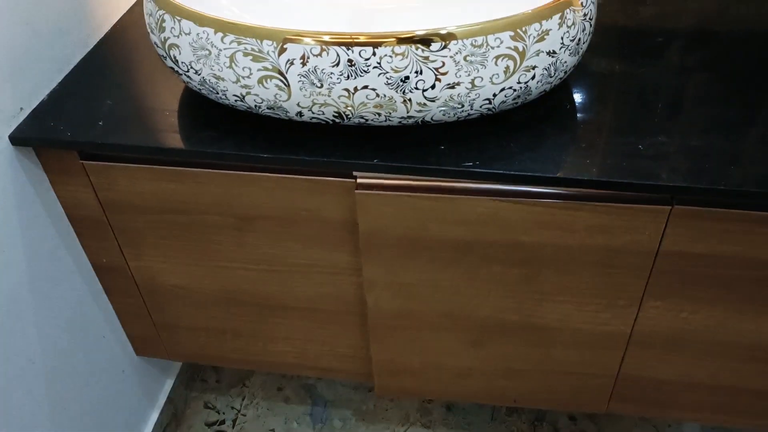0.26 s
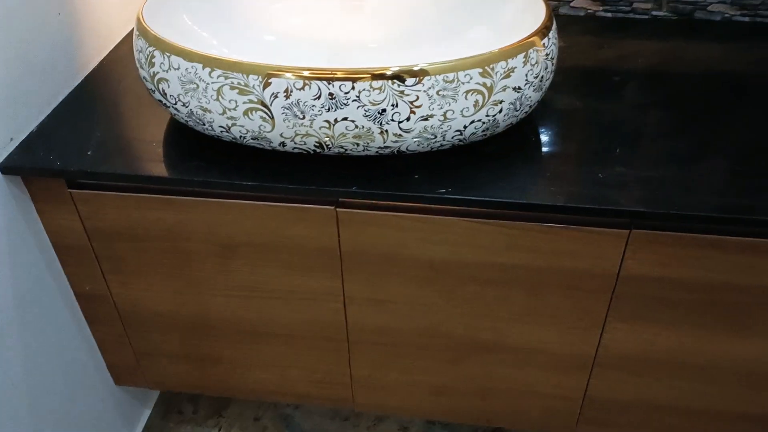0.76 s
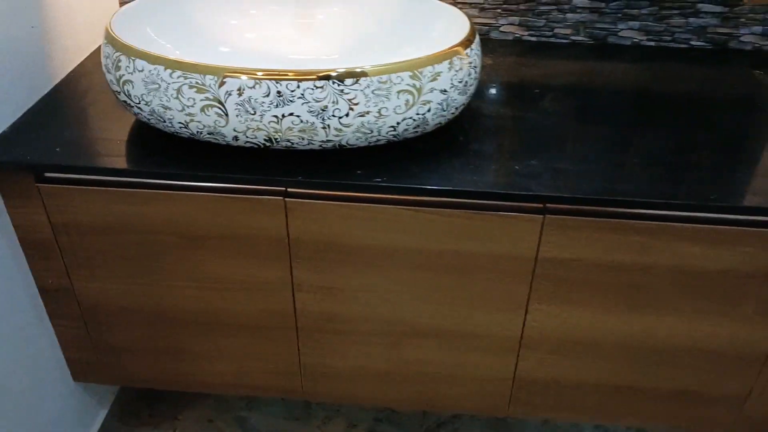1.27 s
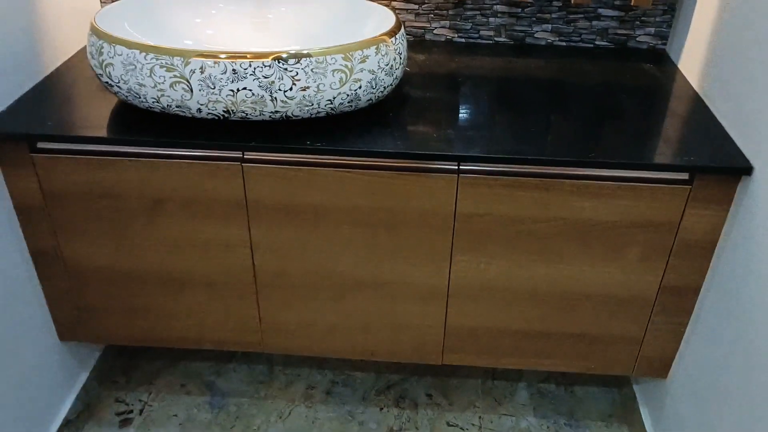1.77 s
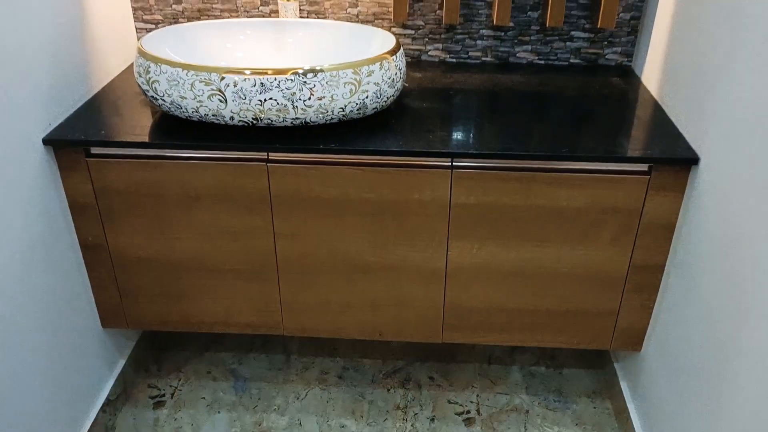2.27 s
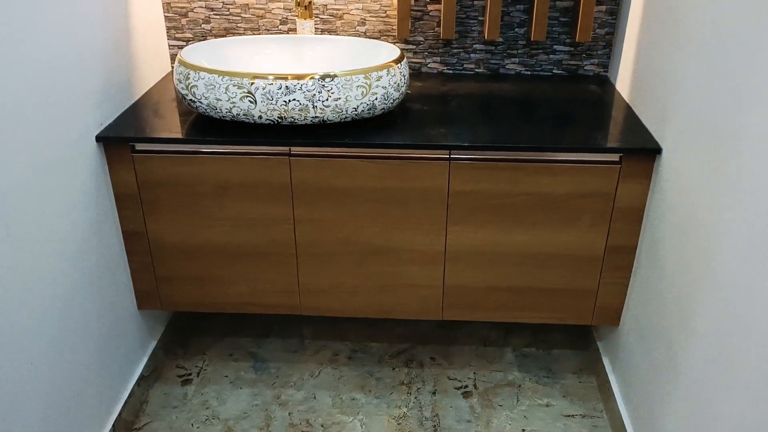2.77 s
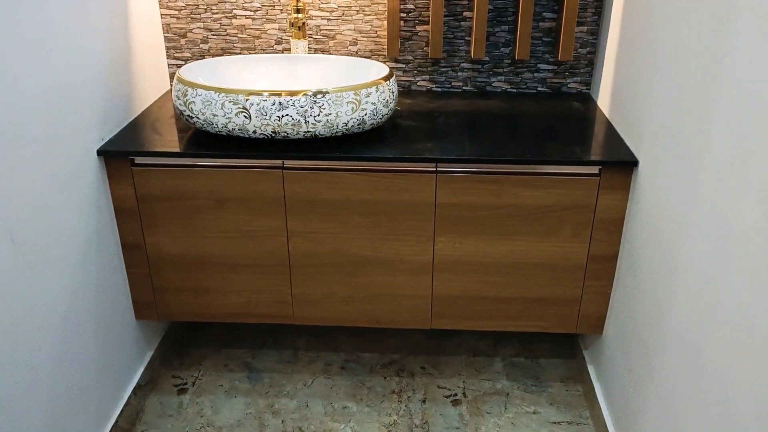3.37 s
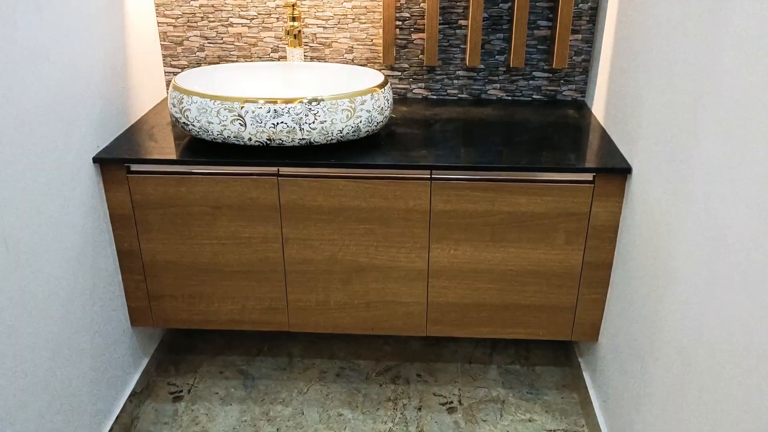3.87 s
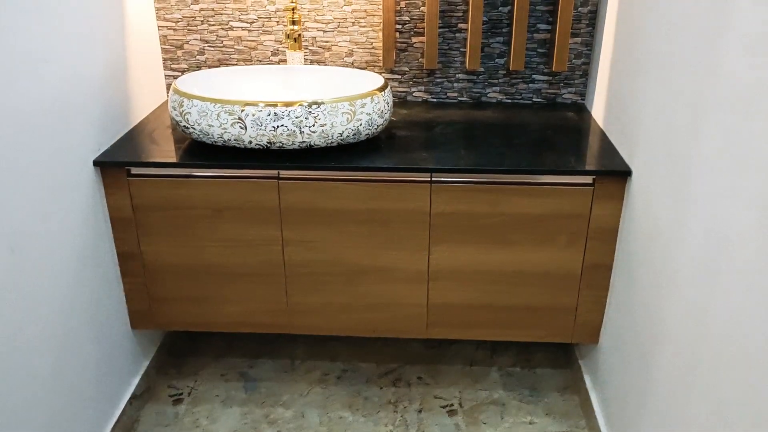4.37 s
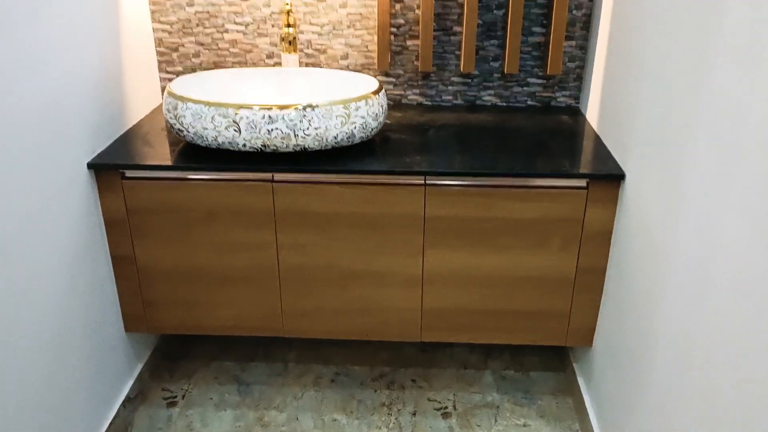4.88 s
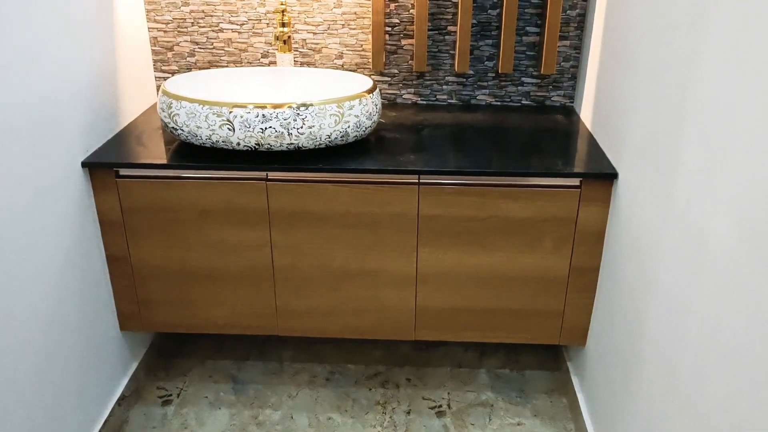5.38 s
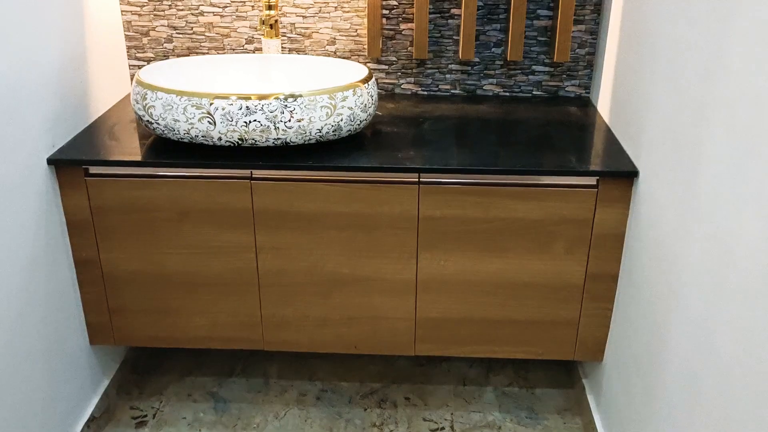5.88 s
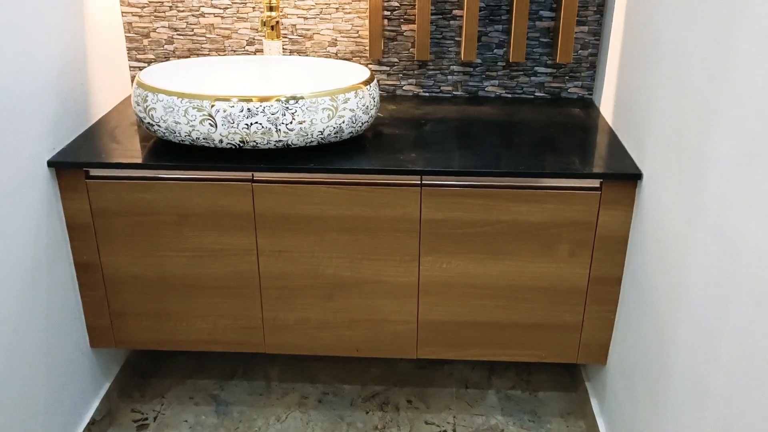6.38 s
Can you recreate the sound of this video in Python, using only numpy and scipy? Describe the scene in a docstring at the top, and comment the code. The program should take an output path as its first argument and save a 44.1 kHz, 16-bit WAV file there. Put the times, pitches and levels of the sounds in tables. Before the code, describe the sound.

Hollow wooden clack of a closing cupboard door, gritty shoe scrapes in a tiled washroom, then loud handling clicks and thumps, with faint cricket chirping.

```python
"""Tiled washroom: a small wooden cabinet door falls shut, its bounces ringing damped panel modes.
Sandals scuff backwards over gritty stone: shaped noise pushed up by grains, with slaps and larger grit on top.
Fingers rub, tick and thump the case of the hand-held recorder close to one microphone port or the other.
A cricket outside chirps in sliding sine strokes, over noise-made hush and hiss, a thin wavering whine and pips."""
import sys
import numpy as np
from scipy import signal
from scipy.fft import rfft, irfft, next_fast_len
from scipy.io import wavfile
from scipy.ndimage import uniform_filter1d

SR = 44100
rng = np.random.default_rng(int(sys.argv[2]) if len(sys.argv) > 2 else 0)


def persist_wave(psi):
    """Save psi, clipped to +-1, as 16-bit WAV."""
    counts = np.round(np.clip(psi, -1, 1) * 32767).astype(np.int16)
    wavfile.write(sys.argv[1], SR, np.atleast_2d(counts).T)


N = 292378  # length in samples


def amp(db):
    """Decibels to gain."""
    return 10 ** (np.asarray(db) / 20)


def evened(x):
    """Scales to rms 1."""
    return x / np.sqrt(np.mean(x ** 2) + 1e-20)


def read(points, hz):
    """Reads a table on a log-frequency axis."""
    f, value = np.transpose(points)
    return np.interp(np.log(hz + 1), np.log(f + 1), value)


def add(mix, s, sound):
    """Adds a sound into the mix at time s."""
    part = mix[..., max(round(s * SR), 0):][..., :sound.shape[-1]]
    part += sound[..., :part.shape[-1]]


def colour(x, gain):
    """Filters x by a gain given as a function of frequency."""
    size = next_fast_len(x.shape[-1] + 1024)
    spectrum = rfft(x, size) * gain(np.fft.rfftfreq(size, 1 / SR))
    return irfft(spectrum, size)[..., :x.shape[-1]]


def pair(x, pan_db):
    """Pans two channels, left over right; their mean keeps the level of x when they are unrelated."""
    left = 1 / (1 + amp(-2 * np.asarray(pan_db)))  # share of the power
    return 2 * np.array([np.sqrt(left) * x[0], np.sqrt(1 - left) * x[1]])


def ring(hz, t60):
    """One damped mode struck once."""
    t = np.arange(round(t60 * SR) + 20) / SR
    return amp(-60 * t / t60) * np.sin(2 * np.pi * hz * t)


# left-right likeness of diffuse sound: (f/Hz, correlation -1 to 1)
LIKENESS = [(60, 0.91), (150, 0.94), (380, 0.76), (950, 0.018), (2380, -0.16), (5980, -0.38), (15000, 0.22)]


def spread(left, other, hz):
    """Blends two unrelated spectra into a stereo pair: nearly shared bass, separate or opposed treble."""
    same = read(LIKENESS, hz)[:, None]
    return np.array([left, same * left + np.sqrt(1 - same ** 2) * other])


# room hush and microphone hiss at the left port: (f/Hz, relative level/dB per Hz)
HUSH_LEFT = [(30, -34), (130, -10.5), (220, -17), (280, -10.5), (420, -19.5), (520, -24), (800, -20.5),
             (1000, -29), (2300, -32.5), (3100, -28), (3800, -32.5), (5800, -31), (7200, -19.5),
             (15500, -7)]
# the same at the right port: (f/Hz, relative level/dB per Hz)
HUSH_RIGHT = [(30, -26.5), (130, -12), (220, -15.5), (280, -10), (420, -17), (520, -20.5), (1200, -26),
              (3100, -22.5), (3700, -25), (4700, -18), (6300, -38.5), (7400, -31.5), (12000, -22),
              (15500, -33)]
HUSH_DB = -60  # rms level


def hush():
    """Random short-time spectra with drifting patches make the room hush and microphone hiss."""
    frames, hz = N // 256 + 5, np.fft.rfftfreq(1024, 1 / SR)
    a, b, c, d, patches, streaks = rng.standard_normal((frames, 513, 6)).T
    patches = evened(uniform_filter1d(uniform_filter1d(patches, 8, 0), 16, 1))
    # narrower and longer, so thin tones come and go
    streaks = evened(uniform_filter1d(uniform_filter1d(streaks, 2, 0), 24, 1))
    z = spread(a + 1j * b, c + 1j * d, hz)
    # the hiss drops above 7.9 kHz, further on the left
    treble_step_db = np.array([[-33.5], [-14.5]])
    shape_db = [read(HUSH_LEFT, hz), read(HUSH_RIGHT, hz)] + treble_step_db / (1 + (7900 / (hz + 1)) ** 60)
    z *= amp(shape_db[:, :, None] + 1.6 * patches + 1.686 * streaks)
    noise = signal.istft(z, nperseg=1024, noverlap=768)[1][:, :N]
    return amp(HUSH_DB) * evened(noise)


# short faint pips: (t/s, length/s, f/Hz, level/dB)
PIPS = [(0, 0.038, 2940, -64), (0.388, 0.029, 3190, -65.5), (0.395, 0.044, 3000, -66),
        (0.674, 0.14, 2100, -73.5), (1.09, 0.12, 2940, -75), (3.923, 0.034, 2760, -63),
        (3.936, 0.046, 2200, -69), (4.17, .1, 3040, -72), (5.18, 0.1, 2570, -70.5),
        (5.534, 0.18, 3240, -70)]
WHINE_HZ, WHINE_DB, WAVER_DB, WAVER_S = 4850, -82, 5.5, 0.069  # a thin tone whose level wavers


def whine():
    """Noise in narrow resonances: one long wavering tone and some short pips."""
    waver = evened(colour(rng.standard_normal(N), lambda f: np.exp(-(f * WAVER_S) ** 2)))
    tone = colour(rng.standard_normal((2, N)), lambda f: 1 / (1 + ((f - WHINE_HZ) / 30) ** 2))
    out = amp(WHINE_DB + WAVER_DB * waver) * pair(evened(tone), -2.5)
    for s, length, hz, db in PIPS:
        size = round(length * SR)
        noise = rng.standard_normal((2, SR // 4))
        pip = colour(noise, lambda f: 1 / (1 + ((f - hz) / 35) ** 2))[:, :size]
        add(out, s, amp(db) * np.hanning(size) * pair(evened(pip), -8))
    return out


# cricket chirps: (t/s, level/dB before the mix, downward slide f/Hz)
CHIRPS = [(0, -48.5, 503), (0.206, -50, 500), (0.457, -47, 613), (0.718, -47, 500), (0.929, -52, 500),
          (1.19, -47, 600), (1.404, -42, 300), (1.676, -43, 400), (1.94, -48, 400), (2.182, -42.5, 397),
          (5.897, -42, 790), (6.105, -37.5, 820), (6.338, -39, 777), (6.58, -40, 600)]


def cricket():
    """Each chirp is four short wing strokes sliding down in pitch; the middle two tend to be strongest."""
    out, t = np.zeros(N), np.arange(800) / SR
    for s, db, slide_hz in CHIRPS:
        for k, (off, fade_db) in enumerate(rng.standard_normal((4, 2))):
            hz = 4700 * (1 + 0.012 * off) - slide_hz * t / t[-1]
            stroke = np.sin(2 * np.pi * np.cumsum(hz) / SR) * np.hanning(len(t))
            stroke_db = db + 1.2 * fade_db - 1.4 * (k - 1.5) ** 2
            add(out, s + 0.028 * k, amp(stroke_db) * stroke)
    # the end of a deep slide hardly reaches the left port
    left = colour(out, lambda f: 1 / (1 + ((f - 4520) / 200) ** 2))
    return np.array([left, out])


# decay of the room: (f/Hz, t60/s)
WALLS = [(100, 0.2), (500, 0.23), (2000, 0.32), (6000, 0.25), (14000, 0.33)]


def room(x):
    """Sparse taps of random sign for each ear, each band dying at its own speed; the bass is shared."""
    taps = np.zeros((2, SR))
    at = np.arange(200, SR - 20, 20) + rng.integers(0, 20, (2, (SR - 201) // 20))
    np.put_along_axis(taps, at, rng.choice([-1., 1.], at.shape), 1)
    hz, t, z = signal.stft(taps, SR, nperseg=512)
    decay = amp(-60 * t / read(WALLS, hz)[:, None])
    tail = signal.istft(spread(z[0], z[1], hz) * decay, SR, nperseg=512)[1]
    return signal.fftconvolve(x, tail / np.linalg.norm(tail[0]), axes=1)[:, :N]


# how the ports colour airborne sound: (f/Hz, left over right level/dB)
PORTS = [(100, -0.5), (400, -1), (800, 2), (1300, -4), (2200, -5), (3200, -1), (4700, -6.5), (5600, -1.5),
         (6500, 13), (7500, 10), (8500, -3.5), (10000, -1.5), (12000, -11.5), (15000, -3.5)]


def ports(air):
    """The two microphone ports favour different bands of airborne sound."""
    return colour(air, lambda f: pair(np.ones((2, len(f))), read(PORTS, f)) / np.sqrt(2))


def patchy(x, depth_db):
    """The contact keeps shifting, so resonant patches come and go in a rubbing sound."""
    z = signal.stft(x, nperseg=256, noverlap=192)[2]
    field = rng.standard_normal(z.shape[1:])
    field = uniform_filter1d(uniform_filter1d(field, size=3, axis=0), size=20, axis=1)
    patches = amp(depth_db * evened(field))
    return signal.istft(z * patches, nperseg=256, noverlap=192)[1][:, :x.shape[-1]]


def gritty(size, per_s, spread_db, share):
    """Rubbing noise at both ears, pushed up briefly by grains of uneven size that come in clumps."""
    clumps = amp(5 * evened(uniform_filter1d(rng.standard_normal(size), 400)))
    sizes = amp(spread_db * np.minimum(rng.exponential(1, size), 4))
    grains = (rng.random(size) < clumps * per_s / SR) * sizes
    grains = signal.lfilter([1], [1, -.85], grains)  # each grain grinds for a fraction of a millisecond
    push = 1 - share + share * evened(grains)
    return patchy(rng.standard_normal((2, size)) * push, depth_db=1.9)


def three_bands(x, spectrum, low_hz, top_hz):
    """Colours x and splits it: below low_hz, from there to top_hz, and above 8 kHz, each at rms 1."""
    x = colour(x, lambda f: amp(read(spectrum, f)))
    low = colour(x, lambda f: 1 / (1 + (f / low_hz) ** 14))
    middle = colour(x - low, lambda f: 1 / (1 + (f / top_hz) ** 8))
    high = colour(x, lambda f: 1 - 1 / (1 + (f / 8000) ** 12))
    return evened(low), evened(middle), evened(high)


RISE_DB, FADE_DB = 30, 40  # contact starts this far down and fades by this much


def contact(rise_s, hold_s, change_db, fade_db_per_s):
    """Rise, hold and fade of a rubbing contact: its gain, and how many dB it has faded."""
    hold_s = max(hold_s, .001)
    t = np.arange(-rise_s, hold_s + FADE_DB / fade_db_per_s, 1 / SR)
    faded_db = fade_db_per_s * np.maximum(t - hold_s, 0)
    held_db = np.interp(t, [-rise_s, 0, hold_s], [-RISE_DB, 0, change_db])
    return amp(held_db - faded_db), faded_db


# a finger slides: (full contact t/s, level/dB, rise/s, hold/s, change over the hold/dB, fade/dB per s,
# left over right/dB, treble above 8 kHz/dB, rumble/dB, treble left over right/dB,
# low edge f/Hz, high edge f/Hz, share of stick-slip grains 0-1)
RUBS = [(1.847, -47.5, 0.0044, 0.019, 3.5, 147, 28, -9, -17.5, 27, 1220, 7800, .14),
        (1.936, -47.5, .06, 0.046, 3, 400, 29, -13.5, -26, 26, 1140, 6700, .14),
        (4.465, -49.5, 0.014, 0.021, 1, 900, 22, -23, -25, 8, 504, 5300, .36),
        (4.636, -45, 0.011, 0.039, -2.5, 1000, 19, -16, -24, 21, 550, 6100, .1),
        (4.741, -53.5, 0.0083, 0.015, 0, 1400, 22, -21, -28, 0, 607, 5960, 0.02),
        (4.779, -55, 0.0076, 0.033, -6.5, 900, 0, -17, 0, -5, 390, 7200, .4),
        (4.848, -41, 0.031, 0.021, 11.5, 2000, -1, -19.5, -10, -7, 308, 6500, .17),
        (4.88, -41, .006, 0.017, -10.5, 600, -2, -13, 3.5, -11.5, 307.6, 6500, .17),
        (4.935, -45.5, 0.026, .003, 0.5, 701, -18, -9, -4, -29, 2500, 5300, .3),
        (4.9455, -27, 0.0018, 0.00078, -5, 7000, -27.5, 3.5, -8, -39, 400, 8100, 0),
        (4.95, -41.5, 0.0043, 0.028, -2.5, 1300, -14, -6, 0.5, -32, 400, 8100, .62),
        (5.003, -62.5, 0.022, .02, -1.5, 300, -15, -5.5, 4, -25, 401, 8130, 0.1),
        (5.049, -44.5, 0.021, 0.042, -1, 452, -31, -9, -11, -33, 298, 5300, 0.02),
        (5.299, -62.5, 0.028, 0.13, -2.5, 1500, -21, -24, -7.5, -4, 840, 2900, .03)]
# skin near the left port: (f/Hz, relative level/dB per Hz)
SKIN_LEFT = [(47, -40), (80, -13.5), (278, -12.5), (508, -20.5), (776, -1), (1080, -13), (1420, -8.5),
             (3020, -8), (4310, -15), (6020, -9), (8220, -23), (14300, -19), (16400, -20.5)]
# skin near the right port: (f/Hz, relative level/dB per Hz)
SKIN_RIGHT = [(47, -34), (80, 8), (228, -3.5), (364, 1), (486, -6.5), (776, -2), (2210, -12.5), (2700, -17),
              (5270, -4.5), (7520, -30), (12000, -24), (15300, -32.5), (16400, -45)]
# the case ticks as skin lets go: (t/s, level/dB, left over right/dB, f/Hz, t60/s, port whistle/dB)
TICKS = [(1.847, -36, 20, 2500, 0.0019, -20), (4.532, -30, 24, 1640, 0.0013, -40),
         (4.54, -38.5, -15, 3000, 0.00079, -21), (4.632, -23, 30, 2155, 0.0041, -25),
         (4.78, -39.5, 19, 2500, 0.0051, -24), (4.792, -48, -12, 3000, .003, -15),
         (4.801, -46, -10, 5000, .003, -6), (4.843, -26.5, -14, 3650, 0.0033, -15),
         (4.848, -23, -15, 1200, 0.0019, -30), (4.857, -20, -25, 2660, 0.0024, -30),
         (4.867, -30, -4, 1500, 0.0018, -30), (4.871, -46, -3, 2020, .002, -28),
         (4.891, -25.5, -24, 1410, 0.0026, -6.5), (4.974, -29, -23, 900, .004, -28),
         (4.921, -36, -19, 4500, .003, -20), (4.939, -28.5, -4, 3500, 0.0024, -15),
         (4.9428, -12, -11, 2230, 0.0023, -3), (4.9443, -3.5, -23, 4400, 0.0024, -23),
         (5.111, -33.5, -25, 1120, 0.004, -23), (5.1125, -44, -24, 4530, 0.0027, -20),
         (5.188, -59, -15, 7150, .003, 5), (5.42, -43, -21, 1300, 0.0027, -20),
         (5.4215, -40.5, -15, 4130, 0.0024, -20)]
# the case flexes under the grip: (t/s, level/dB, left over right/dB, f/Hz, left sign against right)
THUMPS = [(4.791, -42, 4, 300, 1), (4.864, -46, 5, 300, 1), (4.873, -19, 25, 185, 1),
          (4.894, -31, 8, 302, 1), (4.9, -30, -11, 350, 1), (4.9418, -9.5, -2, 300, -1),
          (4.9436, -9, 30, 785, -1), (4.9752, -9.5, -24, 278, 1), (5.114, -28, -23, 412, 1),
          (5.617, -38.5, -18, 278, 1)]


def fingers():
    """Skin slides, ticks and thumps travel through the case straight to the ports, with no room."""
    out = np.zeros((2, N))
    for (s, level_db, rise_s, hold_s, change_db, fade, pan_db, treble_db, rumble_db, treble_pan_db,
         low_hz, top_hz, share) in RUBS:
        shape = contact(rise_s, hold_s, change_db, fade)[0]
        slip = gritty(SR // 2, per_s=1500, spread_db=3, share=share)[:, :len(shape)]
        sides = [three_bands(x, skin, low_hz, top_hz) for x, skin in zip(slip, (SKIN_LEFT, SKIN_RIGHT))]
        rumble, hiss, treble = np.swapaxes(sides, 0, 1)
        near = pair(hiss + amp(rumble_db) * rumble, pan_db)
        near += amp(treble_db) * pair(treble, treble_pan_db)
        add(out, s - rise_s, amp(level_db) * shape * near)
    for s, db, pan_db, hz, t60, whistle_db in TICKS:
        tick = ring(hz, t60)
        # the left port hears ticks dull; the right one has a small cavity that whistles
        dull = signal.lfilter(*signal.butter(2, 4500, fs=SR), tick)
        whistling = tick + amp(whistle_db) * ring(11600, t60)
        add(out, s, amp(db) * pair([dull, whistling], pan_db))
    u = np.arange(-600, 600) / SR
    for s, db, pan_db, hz, sign in THUMPS:
        # a push and its rebound on either side
        push = (2 * (np.pi * hz * u) ** 2 - 1) * np.exp(-(np.pi * hz * u) ** 2)
        add(out, s + u[0], .5 * amp(db) * pair([sign * push, push], pan_db))
    return out


# a sole drags: (full contact t/s, drag level/dB, rise/s, hold/s, change over the hold/dB, fade/dB per s,
# fine grit above 8 kHz/dB, sole body below 1.2 kHz/dB, hiss above 3.3 kHz/dB, heel 1 or sole 0)
STEPS = [(1.416, -80.5, .04, .05, 8.5, 600, 6.5, 4, -4, 1),
         (1.48, -35, 0.0039, 0.0069, -1, 221, -12, -13.5, -5.5, 1),
         (1.597, -64, 0.028, 0.065, -1, 61, -9, -5.5, -5, 1),
         (2.284, -40, .025, 0.033, 3.5, 131, -8, -4.5, -4, 0),
         (2.469, -61, 0.025, 0.13, 0, 91, -13, -5.5, 0.5, 0),
         (2.582, -50.5, 0.021, 0.04, 0.5, 300, -3.5, -3.5, -3.5, 0),
         (2.708, -62, 0.067, .04, -3.5, 200, 4, -2, 2, 0),
         (2.761, -50, .04, 0.011, 0.5, 125, -7, -17, -2.5, 0),
         (2.851, -30.5, .036, 0.14, 1, 73, -11, -12, -3, 0),
         (3.08, -37.5, 0.061, 0.18, -2, 109, -9, -14.5, -2, 0),
         (3.491, -46.5, 0.028, 0.025, -0.5, 108.5, -2, -14, 1, 0),
         (3.828, -73.5, 0.022, .02, -7, 150, 18, -4, 7, 0),
         (3.935, -59.5, 0.0092, .005, -2, 605, -11, -19, -10, 0),
         (4.001, -69, 0.013, 0.028, -7.5, 172, 17, -7, 3, 0),
         (4.246, -81.5, .02, 0.018, -5, 200, 13, -15, -2, 0),
         (4.3, -64, 0.036, .025, -7, 598, -20, -22, -18, 0)]
# the first step lands on the heel: (f/Hz, relative level/dB per Hz)
HEEL = [(180, -47), (300, -21), (471, -30), (576, -16), (681, -13), (2730, -6.5), (5430, -11),
        (7720, -25.5), (11500, 3.5), (15300, -7), (16400, -43)]
# the sole on grit: (f/Hz, relative level/dB per Hz)
SOLE = [(180, -38), (300, -17.5), (471, -20), (741, -7.5), (876, -8), (1520, -2), (1770, -9.5),
        (2270, -4.5), (3400, -9.5), (4670, -6), (6640, -10), (8390, -16), (11900, 3), (15300, -7.5),
        (16400, -10)]
# sole slaps and larger grains of grit: (t/s, level/dB, f/Hz)
SNAPS = [(1.4793, -43, 2980), (1.478, -41, 12700), (1.784, -60, 1280), (2.574, -46.5, 1314),
         (2.574, -52.5, 3900), (2.591, -45.5, 1510), (2.615, -66, 2640), (3.057, -36, 770),
         (3.262, -38.5, 2200), (3.82, -63, 12200), (3.989, -56.5, 12100), (3.99, -69, 4500),
         (4.235, -72, 12000)]
LOOSE_HEEL, LOOSE_SOLE = 0.42, 0.2  # share of loose grains 0-1
# dB that each layer gains on the drag for every dB of fade
GRIT_LINGERS, BODY_LINGERS, HISS_LINGERS = 0.11, 0.02, 0.13


def sandals():
    """Soles drag over grit, and a few grains or slaps stand out."""
    out = np.zeros((2, N))
    for s, drag_db, rise_s, hold_s, change_db, fade, fine_db, body_db, hiss_db, heel in STEPS:
        shape, faded_db = contact(rise_s, hold_s, change_db, fade)
        shoe, share = (HEEL, LOOSE_HEEL) if heel else (SOLE, LOOSE_SOLE)
        scrape = gritty(SR, per_s=900, spread_db=2.5, share=share)[:, :len(shape)]
        body, middle, fine = three_bands(scrape, shoe, 1235, 7440)
        drag = colour(middle, lambda f: 1 / (1 + (f / 3300) ** 6))
        layers = evened(drag)
        layers += amp(hiss_db + HISS_LINGERS * faded_db) * evened(middle - drag)
        layers += amp(body_db + BODY_LINGERS * faded_db) * body
        layers += amp(fine_db + GRIT_LINGERS * faded_db) * fine
        add(out, s - rise_s, amp(drag_db) * shape * layers)
    t = np.arange(600) / SR
    for s, db, hz in SNAPS:
        attack = np.minimum(t * hz / 3, 1)  # three cycles of its pitch
        snap = rng.standard_normal((2, 600)) * attack * amp(-60 * t / 0.018)
        snap = colour(snap, lambda f: np.exp(-np.log2((f + 1) / hz) ** 2 / 0.17))
        add(out, s, amp(db) * evened(snap))
    return out


# the door meets its frame and bounces: (t/s, blow level/dB, hardness as a low-pass f/Hz)
BLOWS = [(0.925, -40, 1400), (.931, -27.5, 1420), (.938, -40, 1190), (.945, -30, 910), (.962, -46, 1210),
         (.98, -40, 1210), (0.999, -35.5, 400), (1.017, -60, 400), (1.032, -39, 905), (1.045, -43, 710),
         (1.058, -46, 900), (1.08, -59, 497)]
# modes of the door panel: (f/Hz, level/dB, t60/s)
DOOR = [(41, -3.5, 0.11), (112.3, -11, 0.52), (232, -4.5, 0.085), (276, -7, 0.019), (437, -8, 0.089),
        (543, -17, .06), (662.6, -0.5, 0.1), (693, -0.5, 0.033), (743, -7.5, 0.058), (915, -18.5, 0.078),
        (1003, -18, 0.042), (1185, -10, 0.044), (1340, -12, 0.033), (1426, -13, 0.054),
        (1545, -14.5, 0.043), (1850, -21, 0.056), (2060, -16, .04), (2330, -27, .04)]


def door():
    """Cushioned blows ring the panel's modes, each at its own spot; harder blows reach higher ones."""
    out = np.zeros(N)
    spots = rng.standard_normal((len(BLOWS), len(DOOR)))  # dB by which each spot favours each mode
    for (s, db, hard_hz), spot in zip(BLOWS, spots):
        panel = np.zeros(SR // 2)
        for k, ((hz, mode_db, t60), spot_db) in enumerate(zip(DOOR, spot)):
            add(panel, 0, (-1) ** k * amp(mode_db + spot_db) * ring(hz, t60))
        add(out, s, amp(db) * signal.lfilter(*signal.butter(3, hard_hz, fs=SR), panel))
    # once the door rests on its bumper the ringing is damped
    out *= amp(-600 * np.maximum(np.arange(N) / SR - 1.1, 0))
    return np.array([out, out])


def scene():
    """Airborne sources pass the room and the port colours; the rest reach the microphones directly."""
    insect, steps, wood = cricket(), sandals(), door()
    direct = wood + steps + amp(-14) * insect
    echoes = room(amp(1.5) * wood + amp(-5.5) * steps + amp(-6.5) * insect)
    picked_up = ports(direct + echoes) + fingers()
    # small microphones lose the deepest bass
    thin = signal.sosfilt(signal.butter(3, 70, "high", fs=SR, output="sos"), picked_up)
    return thin + whine() + hush()


EDGE_HZ = 15850  # upper band limit


def record(dry):
    """The input stage rounds off loud peaks; then the band limit."""
    rounded = .95 * np.tanh(dry / .95)
    low_pass = signal.firwin(511, EDGE_HZ, window=("kaiser", 9), fs=SR)
    return signal.oaconvolve(rounded, low_pass[None], "same")


dry = scene()
out = record(dry)
persist_wave(out)
```